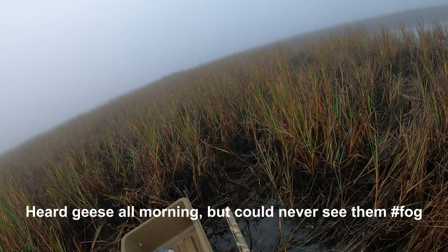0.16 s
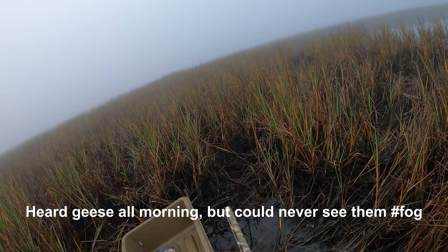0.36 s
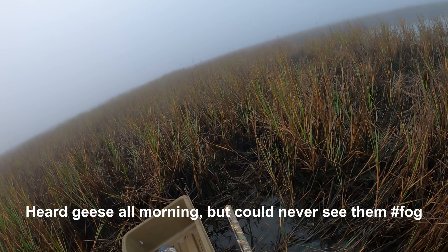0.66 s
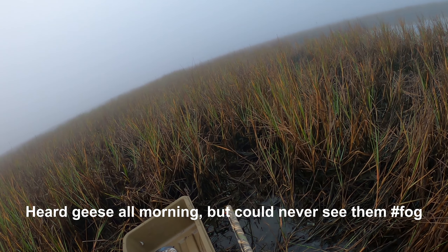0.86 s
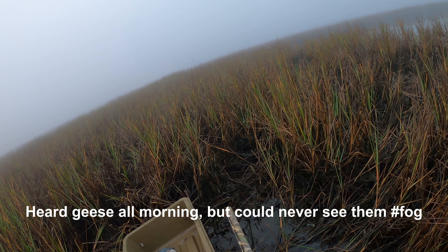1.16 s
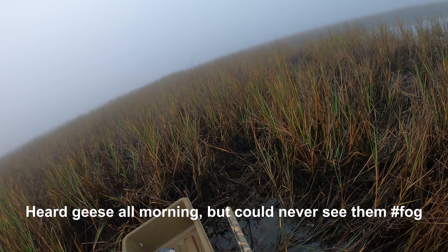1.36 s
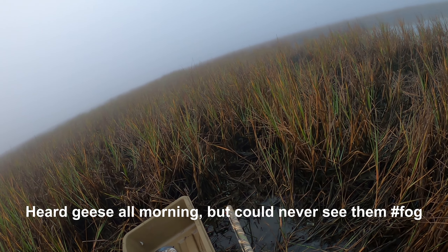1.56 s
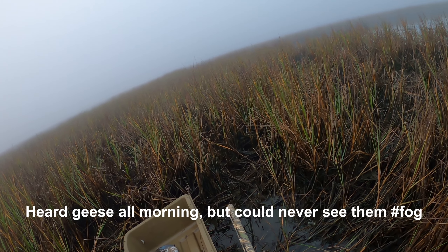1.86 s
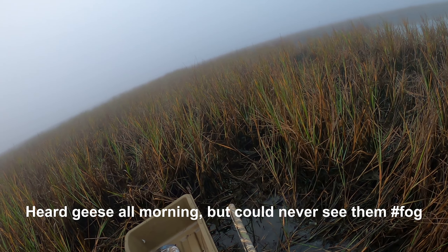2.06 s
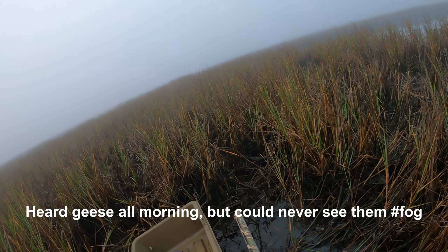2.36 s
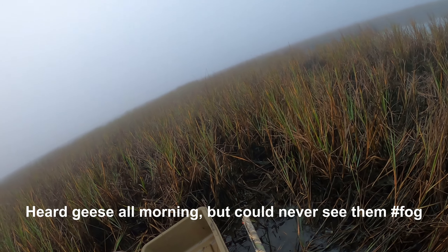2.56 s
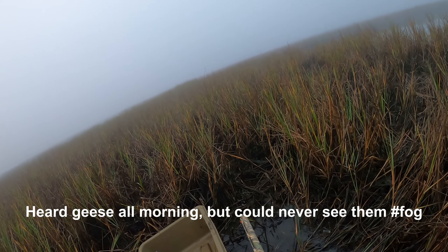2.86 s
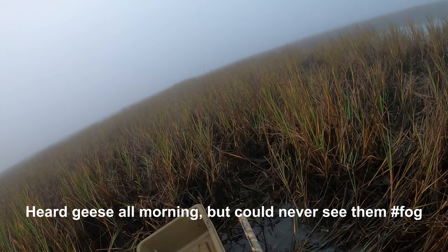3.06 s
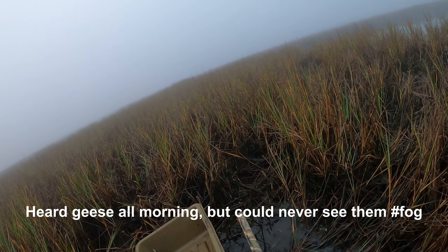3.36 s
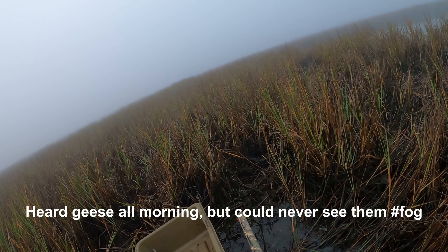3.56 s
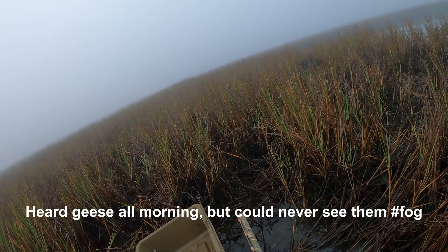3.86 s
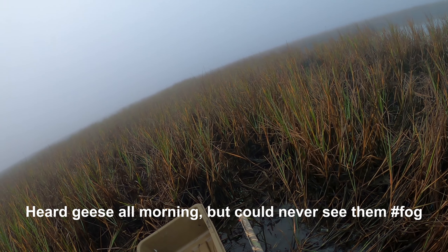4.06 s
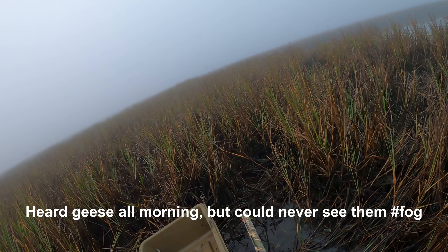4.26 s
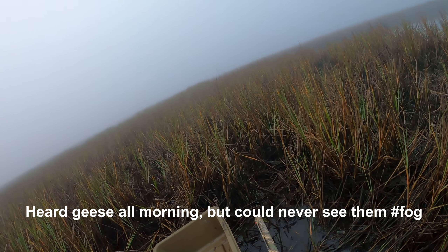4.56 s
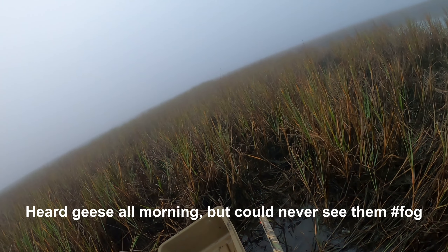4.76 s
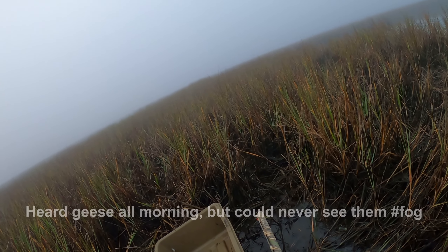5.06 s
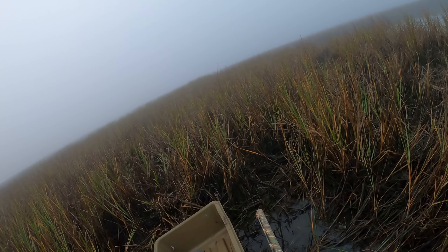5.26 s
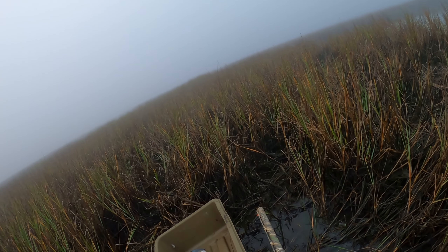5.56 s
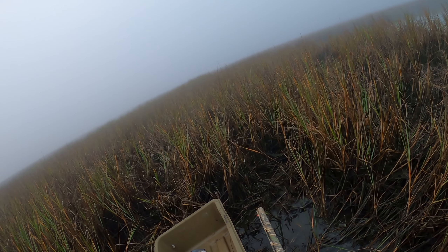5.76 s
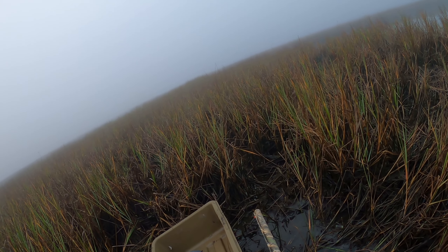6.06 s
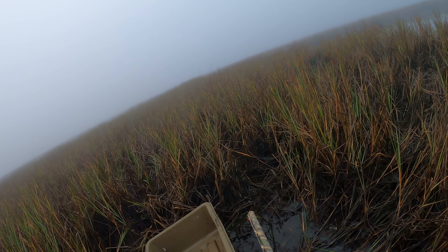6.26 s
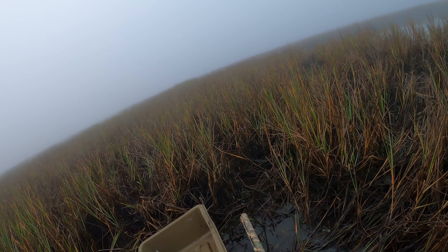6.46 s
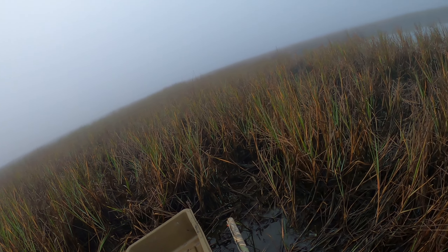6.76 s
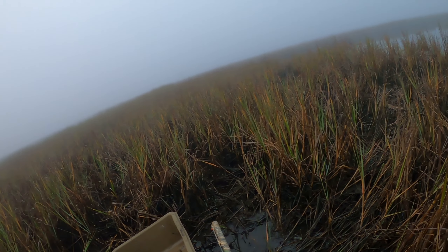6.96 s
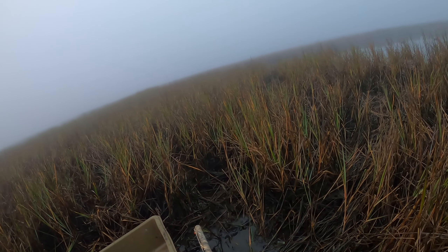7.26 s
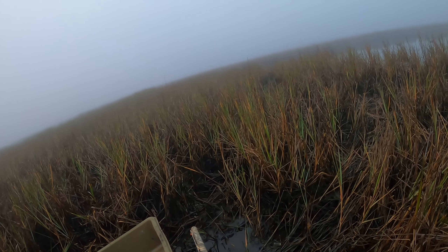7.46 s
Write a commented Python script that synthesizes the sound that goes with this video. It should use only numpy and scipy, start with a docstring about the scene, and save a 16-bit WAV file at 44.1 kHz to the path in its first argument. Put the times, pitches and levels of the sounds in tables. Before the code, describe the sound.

A flock of geese calls throughout from some way off across an open marsh: short, overlapping honks, higher yelps and a few low grunts, lightly echoing, with a duller chatter of farther birds behind. Underneath, a distant engine keeps up a low, slightly wavering drone and rumble, with a very faint hiss of air. The calls are scattered at first, thicken from about 2 seconds and are strongest between 3 and 5.5 seconds. A small bird gives faint, thin, high chips now and then from about 1 to 6 seconds. Two soft, crisp ticks come from the reeds at around 4.6 and 4.8 seconds. At about 5.9 seconds comes one sudden, dull, low thump, far louder than anything else, with a brief low ring and a short rolling tail. The geese continue a little more softly over the drone until the end, near 7.6 seconds.

```python
"""A flock of geese honks, yelps and grunts over a foggy marsh, with a chatter of far birds behind it.
Each call is a gliding harmonic series filtered by the throat, then scattered by reeds and water.
A far engine drones at multiples of its firing rate, under a faint hiss of air. A small bird chips,
and two short ticks and a faint rustle come from the reeds.
One dull, low thump sounds, with a brief low ring and a rolling tail."""
import sys
import numpy as np
from scipy import signal
from scipy.fft import rfft, irfft, next_fast_len
from scipy.io import wavfile
from scipy.ndimage import uniform_filter1d

SR = 44100
rng = np.random.default_rng(int(sys.argv[2]) if len(sys.argv) > 2 else 0)


def master(y):
    """Save y as 16-bit WAV."""
    cut = np.clip(np.atleast_2d(y).T, -1, 1)
    pcm = np.round(cut * 32767)  # scale
    wavfile.write(sys.argv[1], SR, pcm.astype(np.int16))


N = 336476

# goose calls: t/s, length/s, f/Hz, glide from start to end/%, level/dB
GOOSE_CALLS = [(0, 0.075, 950, 4, -64), (0.038, 0.093, 1378, -1, -67.5), (0.303, 0.1, 950, 2.5, -67.5),
               (0.52, .03, 865, 4, -73), (0.548, 0.09, 875, -8, -70), (0.65, .19, 860, 6.5, -75),
               (0.855, .03, 800, 10, -69), (0.882, 0.11, 870, 1, -62.5), (0.91, .07, 1040, 8, -68),
               (0.968, 0.03, 1100, -8, -68.5), (0.99, .04, 810, -14, -68), (0.989, 0.093, 934, -4.5, -69),
               (1.157, 0.041, 968, -6, -71), (1.386, .09, 997.6, -4, -73), (1.414, 0.061, 1275, -1, -66),
               (1.519, 0.058, 974, 5, -73), (1.552, 0.052, 1207, -9, -67), (1.594, 0.1, 940, 14, -69),
               (1.82, 0.045, 1040, 12, -62), (1.887, .056, 282.6, 8, -64.5), (1.893, .13, 1265, -16, -72.5),
               (1.928, 0.11, 880, -9, -60), (2.044, 0.065, 286, 3, -68.5), (2.074, .08, 870, 4, -63),
               (2.054, .12, 1000, 8, -68), (2.115, 0.07, 300.7, 2.5, -65), (2.152, 0.09, 825, -22, -58),
               (2.258, 0.097, 1400, -9, -60), (2.332, 0.032, 1272, -21, -68), (2.357, .043, 960, -2, -67),
               (2.47, .055, 1400, 4, -63), (2.515, .09, 1410, -14, -68), (2.56, 0.071, 1062, -16, -75),
               (2.614, 0.024, 1004, 7, -63.5), (2.631, 0.065, 288, -0.5, -61),
               (2.695, 0.048, 1373, -3, -63.5), (2.722, 0.055, 960, -7, -63), (2.777, .048, 950, 5, -64),
               (2.818, 0.053, 268, -3.5, -65.5), (3.04, 0.045, 290, 18, -65), (3.075, 0.092, 875, -12, -55),
               (3.167, 0.035, 850, 4, -60), (3.18, .151, 296, 2.5, -62), (3.2, .118, 880, 3, -58),
               (3.316, .056, 810, -19, -59), (3.385, 0.045, 1070, 1.5, -66.5), (3.49, 0.12, 1030, -5, -64),
               (3.588, .04, 880, 9, -63), (3.573, 0.11, 962, 5, -59), (3.678, 0.09, 277, -3, -56),
               (3.768, 0.035, 980, -6, -53), (3.803, 0.045, 1000, 11, -54), (3.843, 0.053, 280, 0.5, -57),
               (3.875, .045, 830, -10.5, -58.5), (3.94, 0.105, 1068, -2, -66.5),
               (4.125, 0.027, 1000, 1.5, -64), (4.152, .014, 1300, 25, -60), (4.166, .03, 1480, 1, -56),
               (4.174, 0.022, 860, 0, -57), (4.196, .04, 825, -7, -66), (4.203, 0.039, 960, 0, -63.5),
               (4.232, 0.03, 1400, -2, -59), (4.262, .032, 1220, -26, -64), (4.294, .016, 1000, 0, -60),
               (4.24, 0.095, 913, -3, -59), (4.31, .035, 1260, 14, -63), (4.36, .035, 930, 16, -65),
               (4.395, .035, 930, -14, -64), (4.435, 0.04, 1180, 5, -65), (4.392, 0.042, 1400, -3, -61),
               (4.446, 0.08, 915, -7, -61.5), (4.519, 0.11, 860, 10, -59), (4.63, .06, 810, -20, -62),
               (4.619, 0.09, 283, -1.5, -60.5), (4.7, 0.07, 985, 2, -70), (4.86, 0.06, 983, 2, -74),
               (4.908, 0.03, 1000, 2, -63), (4.938, 0.025, 1470, 9, -56), (4.965, 0.053, 1700, -3, -60),
               (5.018, 0.045, 1410, -7, -57.5), (5.066, 0.022, 1000, 1, -63), (5.088, 0.035, 1420, 5, -60),
               (5.29, .09, 1010, 1, -69), (5.298, .133, 1383, -1.5, -58.5), (5.315, 0.07, 831, -1, -60),
               (5.39, .04, 1000, -6, -68), (5.43, 0.055, 930, 8, -68), (5.486, 0.11, 1390, -1, -66),
               (5.597, .051, 1430, 4.5, -62), (5.613, 0.055, 1528, -3, -58.5),
               (5.633, 0.22, 1018, -8.5, -67.5), (5.648, 0.13, 1305, -2, -66),
               (5.763, 0.097, 290, -1.5, -65), (5.845, 0.085, 852, 2, -67.5), (5.983, 0.063, 1250, -3, -71),
               (6.038, 0.1, 918, -8, -71), (6.169, 0.068, 1297, -4, -69), (6.177, 0.12, 808, 2, -74),
               (6.255, 0.035, 1030, -6, -67), (6.295, .08, 985, 3, -69), (6.36, 0.052, 1290, -8, -65),
               (6.42, .045, 990, -9, -69), (6.387, 0.059, 347, -0.5, -65), (6.543, 0.035, 895, 1, -69),
               (6.56, 0.095, 955, -9, -71), (6.71, 0.03, 1450, 8, -61.5), (6.795, 0.035, 1330, -14, -66),
               (6.836, 0.061, 1415, 1, -64), (6.87, 0.068, 1520, -8, -66), (6.895, .05, 1260, -10, -69),
               (7.053, 0.052, 1390, -4, -65), (7.09, 0.1, 875, 6, -65), (7.205, .04, 811, -8, -70),
               (7.18, .04, 1103, -6, -70.5)]


def undb(db):
    """Decibel law: 20 dB is a factor of ten in amplitude."""
    return 10 ** (np.asarray(db) / 20)


def shape(points, hz):
    """Spectral envelope: a table of f/Hz, level/dB, interpolated in log frequency."""
    f, db = np.transpose(points)
    return np.interp(np.log(np.maximum(hz, 1)), np.log(f), db)


def noise(points, db):
    """Spectral shaping: white noise filtered to the given envelope, at rms level db."""
    size = next_fast_len(N, True)
    hz = np.fft.rfftfreq(size, 1 / SR)
    inside = (hz > points[0][0]) & (hz < points[-1][0])
    x = irfft(rfft(rng.standard_normal(size)) * undb(shape(points, hz)) * inside, size)[:N]
    return x * undb(db) / x.std()


def walk(per_s):
    """Random modulation: per_s values a second, joined smoothly, with a spread near 1."""
    grid = np.arange(0, N + 32, 32)
    place = grid * per_s / SR
    step, part = place.astype(int), place % 1
    levels = rng.standard_normal(step[-1] + 2)
    smooth = levels[step] + (levels[step + 1] - levels[step]) * part ** 2 * (3 - 2 * part)
    return 1.15 * np.interp(np.arange(N), grid, smooth)


def add(out, s, x):
    """Superposition: x joins out from time s."""
    i = max(int(s * SR), 0)
    out[i:i + len(x)] += x[:N - i]


def decay(t, t60):
    """Exponential damping: 60 dB down after t60 seconds."""
    return np.exp(-np.log(1000) * t / t60)


def echoes(x, t60, db):
    """Diffuse scattering: reeds and water add a decaying tail to the direct sound."""
    t = np.arange(SR // 2) / SR
    tail = rng.standard_normal(len(t)) * decay(t, t60) * (t > .008)
    return x + undb(db) * signal.oaconvolve(x, tail / np.sqrt(np.sum(tail ** 2)))[:N]


def air():
    """Broadband ambient noise: the steady hiss of damp air."""
    hiss_spectrum = [(300, -3.5), (700, -4), (1500, -9.5), (3000, -13.5), (5500, -21), (8000, -30.5),
                     (15500, -31.5)]  # f/Hz, level/dB
    return noise(hiss_spectrum, db=-82)


def engine():
    """Periodic firing makes harmonics; on the long path through moving air each fades and drifts."""
    # engine's course: t/s, firing f/Hz, then level/dB of bass, upper band, hum and whine
    running = [(0, 30.61, -44.5, -49, -48, -80), (.7, 30.68, -41, -45, -45, -80),
               (1.5, 30.98, -42.5, -42.5, -46, -78), (2.7, 31.1, -41.5, -46, -48, -78),
               (3.7, 31.19, -45.5, -43.5, -51, -78), (4.699, 31.38, -43, -41.5, -50, -75),
               (5.8, 31.57, -41, -42, -48, -77), (6.3, 32.02, -45.5, -42, -53, -80),
               (6.8, 32.3, -51.5, -41, -56, -70), (6.98, 32.57, -40.5, -43, -55, -70),
               (7.119, 32.3, -52.5, -41.5, -54, -70), (7.63, 32.3, -47, -41, -51, -74)]
    orders = [(2, -6), (3, -3.5), (4, -5), (6, -21), (7, -19.5), (8, -17), (9, -29), (10, -31)]  # harmonics of the firing rate: multiple, level/dB
    whine_orders = [(13, -2.5), (21, -15)]  # high harmonics: multiple, level/dB
    rumble_spectrum = [(15, -16.5), (35, -8), (60, -1.5), (100, 0), (165, -4.5), (200, -18), (260, -38.5)]  # f/Hz, level/dB
    wash_spectrum = [(150, -7), (240, -0.5), (300, -12), (400, -27), (600, -33), (900, -46.5)]  # f/Hz, level/dB
    t = np.arange(N) / SR
    moments, *columns = np.transpose(running)
    firing_hz, bass_db, upper_db, hum_db, whine_db = (np.interp(t, moments, c) for c in columns)
    phase = 2 * np.pi * np.cumsum(firing_hz) / SR

    def harmonic(k, db, fade_db, drift):
        return undb(db + fade_db * walk(per_s=6)) * np.sin(k * (phase + drift * walk(per_s=8)))

    low = sum(harmonic(k, db, fade_db=3.1, drift=.09) for k, db in orders[:3])
    high = sum(harmonic(k, db, fade_db=3.1, drift=.08) for k, db in orders[3:])
    whine = sum(harmonic(k, db, fade_db=2.2, drift=.03) for k, db in whine_orders)
    drone_hz = 81  # a second tone, apart from the harmonics
    drone = undb(-2 + 2.5 * walk(per_s=6)) * np.sin(2 * np.pi * drone_hz * t + .82 * walk(per_s=5))
    bass = low + drone + noise(rumble_spectrum, db=-3)
    upper = high + noise(wash_spectrum, db=-18.5) * undb(3.4 * walk(per_s=4))
    hum = harmonic(5, hum_db + 1.5, fade_db=1.7, drift=.07)
    return undb(bass_db - 2) * bass + undb(upper_db - 1.5) * upper + hum + undb(whine_db) * whine


def reeds():
    """Amplitude modulation of bright noise: two narrow pulses tick, a wide one rustles."""
    pulses = [(4.578, -63.5, 0.02), (4.808, -66, 0.019), (7.057, -84.5, 0.15)]  # Gaussian swells: t/s, level/dB, width/s
    reed_spectrum = [(3500, -16), (5200, 1), (7000, 3), (8800, -9), (10500, -33)]  # f/Hz, level/dB
    t = np.arange(N) / SR
    swell = sum(undb(db) * np.exp(-3 * ((t - s) / width) ** 2) for s, db, width in pulses)
    return echoes(swell * noise(reed_spectrum, db=-2), t60=.26, db=-11)


def small_bird():
    """Biphonation: two voices at once glide, mostly downward, in thin chips."""
    # chips: t/s, level/dB, settling f/Hz, share by which f starts higher, length/s, second voice/dB
    chips = [(0.774, -82, 3260, 0.28, .05, -30), (1.097, -74, 7120, 0.21, 0.077, -0.5),
             (2.195, -83.5, 7880, 0.09, 0.023, -17), (3.194, -78, 6700, -0.46, 0.027, -36),
             (3.803, -76.5, 7030, .24, 0.061, -3), (4.445, -75, 4690, -.05, .1, -40),
             (4.688, -81, 7260, .24, .05, -24), (5.218, -86, 7220, 0.2, .06, -7),
             (6.236, -91, 7030, 0.2, 0.072, -4)]
    out, glide_s = np.zeros(N), .019
    for s, db, hz, glide, length, second_db in chips:
        t = np.arange(int(length * SR)) / SR
        phase = 2 * np.pi * np.cumsum(hz * (1 + glide * np.exp(-t / glide_s))) / SR
        swell = np.abs(np.sin(np.pi * (t / length) ** 1.1)) ** .6
        add(out, s, undb(db) * swell * (np.sin(phase) + undb(second_db) * np.sin(1.15 * phase)))
    flutter = undb(4.5 * walk(per_s=300) - 1.5)
    return echoes(out * flutter, t60=.36, db=-5)


def thump():
    """Damped transient: one dull, low thump with a brief low ring and a rolling tail."""
    s, hz, length, db = (5.9255, 184, 0.016, -9.5)  # pressure pulse: t/s, f/Hz, length/s, level/dB
    ring_tones = [(54, -17.5, 0.12), (125, -19.5, .12), (240, -27.5, 0.11), (313.5, -25.5, 0.082),
                  (455, -34.5, .1), (788, -33, .07)]  # damped low tones: f/Hz, level/dB, t60/s
    wash_spectrum = [(80, -18.5), (200, 1), (350, -4), (800, -13.5), (1500, -11.5), (2400, -32),
                     (3500, -50), (9000, -86)]  # f/Hz, level/dB
    roll_spectrum = [(250, -19.5), (420, -2.5), (650, -3), (900, -19), (1400, -31)]  # f/Hz, level/dB
    out, t = np.zeros(N), np.arange(int(.5 * SR)) / SR
    pulse_t = t[t < length]
    swell = np.sin(np.pi * pulse_t / length) ** 2
    add(out, s, -undb(db) * swell * np.cos(2 * np.pi * hz * (pulse_t - .0007)))
    ring = sum(undb(level) * np.sin(2 * np.pi * f * t) * decay(t, t60) for f, level, t60 in ring_tones)
    add(out, s + .0158, ring * (1 - np.exp(-t / .001)) ** 2)
    wash = decay(t, t60=.12) * noise(wash_spectrum, db=-28.5)[:len(t)]
    add(out, s + .0019, wash * (1 - np.exp(-t / .003)) ** 2)
    add(out, s + .01, decay(t, t60=.71) * noise(roll_spectrum, db=-49.5)[:len(t)])
    return out


def breaths():
    """Grouping by proximity: calls close in time and pitch form one breath, a chain of row numbers."""
    gap_s, lead_in_s, yelp_hz = .016, .035, 1150
    start, length, hz, glide, _ = np.transpose(GOOSE_CALLS)
    first_hz, last_hz = hz * (1 - glide / 200), hz * (1 + glide / 200)
    step = np.abs(np.log(first_hz / last_hz[:, None]))
    # a yelp may also leap up from a short lead-in
    leaps = (first_hz > yelp_hz) & (length[:, None] <= lead_in_s) & (last_hz[:, None] > 600)
    follows = (np.abs(start - (start + length)[:, None]) < gap_s) & (start > start[:, None])
    joins = follows & ((step < .14) | leaps)
    chains = [[row] for row in range(len(GOOSE_CALLS))]
    for row in np.argsort(-start):
        free = [chain for chain in chains if joins[row, chain[0]]]
        if free:
            nearest = min(free, key=lambda chain: step[row, chain[0]])
            chains.remove([row])
            nearest.insert(0, row)
    return chains


def honk(out, waver, times, pitches, dbs, throat_hz, brightness, scoop=.12, sag=.12):
    """Source and filter: the throat weights the harmonics of one gliding breath; breath noise rasps."""
    throat_response = [(560, -18), (720, 4), (900, 0), (2000, 0), (2600, -10), (3300, -13), (4400, -10),
                       (5800, -20)]  # f/Hz, level/dB
    edge_s, slur_s, sag_s, yelp_hz = .018, .004, .04, 1150
    jitter, shimmer, breath_noise, flicker = waver
    n = int((times[-1] - times[0] + edge_s) * SR)
    t, at = np.arange(n) / SR, rng.integers(N // 2) + np.arange(n)
    onset = times[0] - edge_s / 2
    swell = np.clip(np.minimum(t, t[-1] - t) / edge_s, 0, 1)

    def slur(values):
        return uniform_filter1d(np.interp(t + onset, times, values), int(slur_s * SR), mode="nearest")

    # the pitch scoops up as the breath builds and sags as it fails
    building = (1 - swell) ** 2 * (t < edge_s)
    failing = np.clip(1 - (t[-1] - t) / sag_s, 0, 1) ** 2
    hz = slur(pitches) * (1 - scoop * building - sag * failing)
    phase = 2 * np.pi * np.cumsum(hz * (1 + .009 * jitter[at])) / SR
    k = np.arange(1, int(5800 / max(pitches)) + 1)[:, None]
    grunt, upper = pitches[0] < 600, k * np.mean(pitches) > 2300
    if max(pitches) > yelp_hz:  # a yelp tunes the throat to its own pitch
        resonance_db = -15. * (k > 1)
    else:  # grunts have a narrower resonance than honks
        octaves_off = np.log2(k * hz / slur(throat_hz))
        resonance_db = -np.minimum((70 if grunt else 16) * octaves_off ** 2, 18)
    rolloff_db = -1.1 * np.maximum(k - 8, 0) if grunt else -3. * np.maximum(k - 2, 0)
    # no two throats weigh the upper partials alike, and each partial flickers on its own
    treble_db = upper * (1.3 * brightness + 2.6 * rng.standard_normal((24, 1))[:len(k)])
    gain = undb(shape(throat_response, k * hz) + resonance_db + rolloff_db + treble_db)
    partials = gain * np.where(upper, flicker[(at + 4000 * k) % N], 1) * np.sin(k * phase + k ** 2)
    voice = np.sum(partials, axis=0) / np.sqrt(np.sum(gain ** 2, axis=0) / 2)
    rasp = undb(.37 * brightness - 15) * breath_noise[at]
    envelope = swell ** 1.3 * np.abs(np.sin(np.pi * t / t[-1])) ** .26
    add(out, onset, undb(slur(dbs) + .7 + 2.2 * shimmer[at]) * envelope * (voice + rasp))


def geese():
    """Superposition of voices: near calls stand out from a random chatter of duller, far birds."""
    flock = [(0, -64, -7), (.15, -94.5, -6), (1.3, -88.5, -2.5), (1.5, -70, -2.5), (1.85, -70, 1.5),
             (2.2, -71, -3), (2.85, -73, 4), (2.97, -91.5, -4.5), (3.2, -69.5, -2.5), (3.7, -71, 1),
             (3.95, -78, 2), (4.25, -68, 5), (4.37, -68, 4), (4.7, -69.5, 6), (5.15, -72, 0.5),
             (5.4, -66.5, -1), (5.7, -64, 0.5), (6.1, -71, 0.5), (6.4, -63, -1), (6.6, -85.5, -1),
             (6.9, -70.5, 1), (7.2, -74.5, -3), (7.35, -98.5, 3), (7.63, -84, -2)]  # flock's course: t/s, far chatter level/dB, brightness of all calls
    rasp_spectrum = [(600, -29), (1000, -1), (2000, 1), (2600, -11.5), (5000, -20.5), (6500, -31),
                     (8000, -64)]  # f/Hz, level/dB
    rest_hz, opens_hz_per_db, usual_db, yelp_hz = 1480, 32, -64, 1150
    near, far = np.zeros(N), np.zeros(N)
    waver = walk(per_s=250), walk(per_s=30), noise(rasp_spectrum, db=0), undb(4.5 * walk(per_s=80))
    moments, far_db, brightness = np.transpose(flock)
    place = np.linspace(-1, 1, num=7)  # from the start of a call to its end
    for chain in breaths():
        s, length, hz, glide, db = np.transpose([GOOSE_CALLS[row] for row in chain])[..., None]
        times = np.maximum.accumulate((s + length * (place + 1) / 2).ravel())
        arch = .45 * length * place ** 2  # the pitch droops toward both ends
        pitches = (hz * (1 + glide / 100 * place / 2 - arch)).ravel()
        dbs = np.repeat(db, len(place))
        # a louder call opens the throat and lifts its resonance
        throat_hz = rest_hz + opens_hz_per_db * (dbs - usual_db) * (pitches > 600)
        bend = np.minimum(length.ravel() / .1, 1)  # calls under 0.1 s bend less
        honk(near, waver, times, pitches, dbs, throat_hz, np.interp(times[0], moments, brightness),
             scoop=.3 if pitches[0] > yelp_hz else .1 * bend[0], sag=.12 * bend[-1])
    for when, pitch, rise, fall, span, kind in rng.random((240, 6)):
        hz = 270 + 60 * pitch if kind < .35 else 800 + 700 * pitch  # grunt, or honk or yelp
        pitches = hz * np.array([1 - .1 * rise, 1, 1 - .04 * fall, 1 - .12 * fall])
        times = when * N / SR + np.linspace(0, .02 + .04 * span, num=4)
        honk(far, waver, times, pitches, dbs=np.full(4, -3 - 6 * fall),
             throat_hz=np.full(4, 1200 + 800 * rise),
             brightness=np.interp(times[0], moments, brightness) - 6)
    far *= undb(np.interp(np.arange(N) / SR, moments, far_db))
    return echoes(near, t60=.27, db=-10) + echoes(far, t60=.3, db=-7)


def scene():
    """Linear superposition: the pressures of all sources add in one channel."""
    return (geese() + engine() + small_bird() + reeds() + thump() + air())[None]


def record(dry):
    """Band limiting: a steep elliptic low-pass cuts the top of the treble."""
    cutoff_hz = 15700
    return signal.sosfilt(signal.ellip(8, .2, 70, cutoff_hz, fs=SR, output="sos"), dry)


dry = scene()
out = record(dry)
master(out)
```